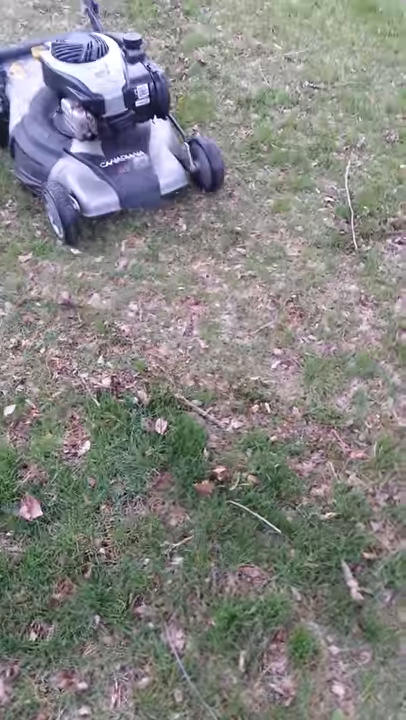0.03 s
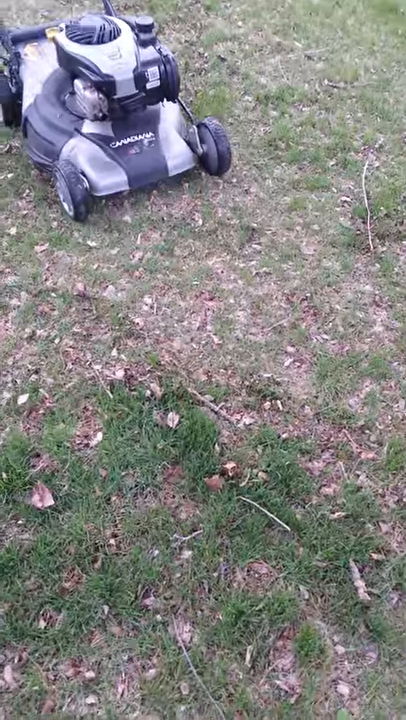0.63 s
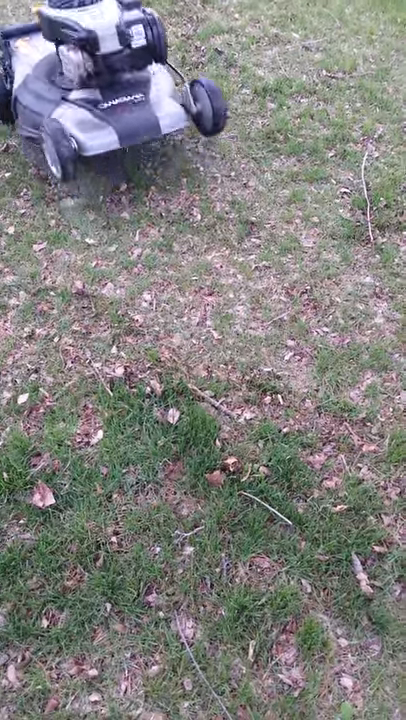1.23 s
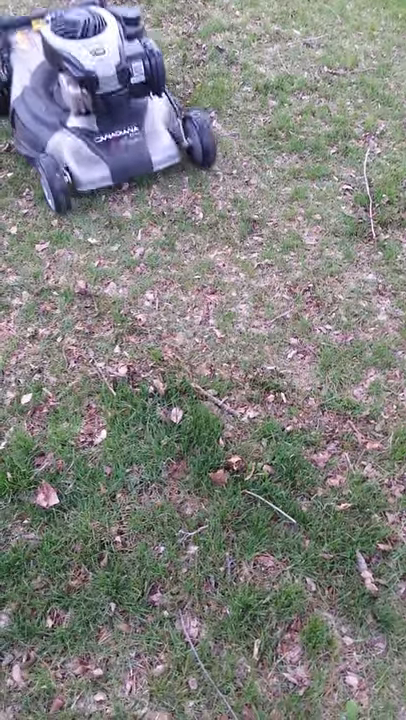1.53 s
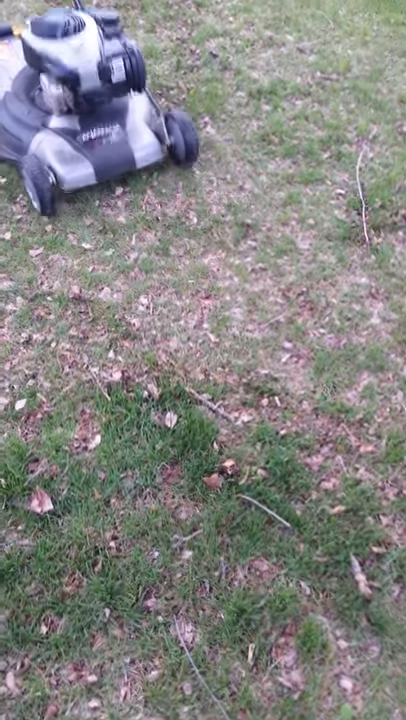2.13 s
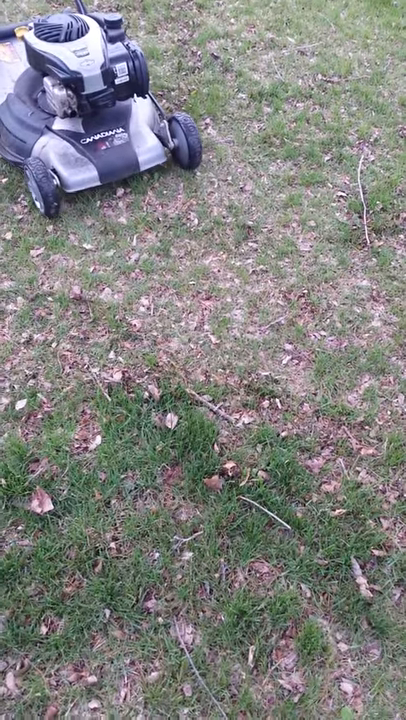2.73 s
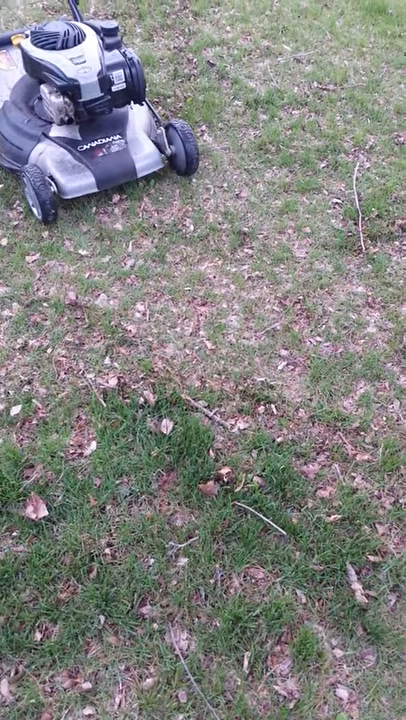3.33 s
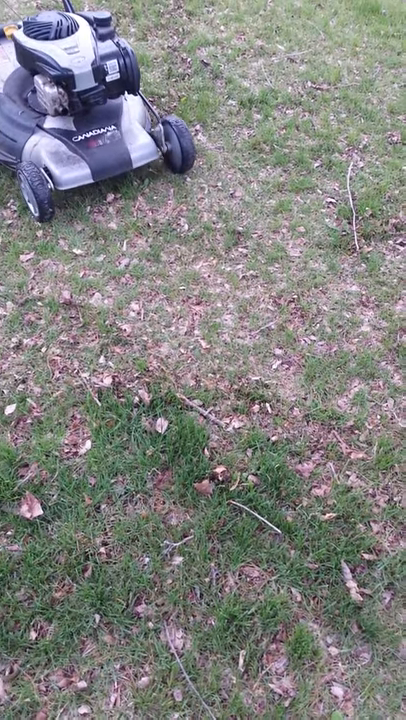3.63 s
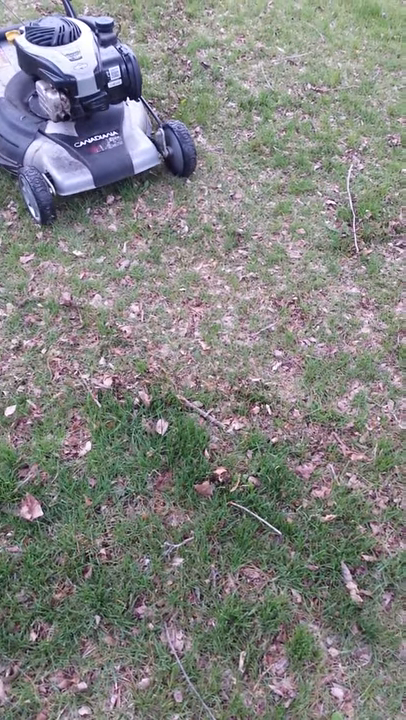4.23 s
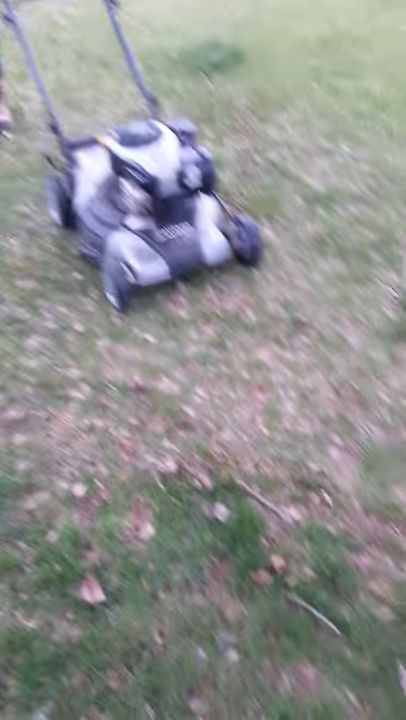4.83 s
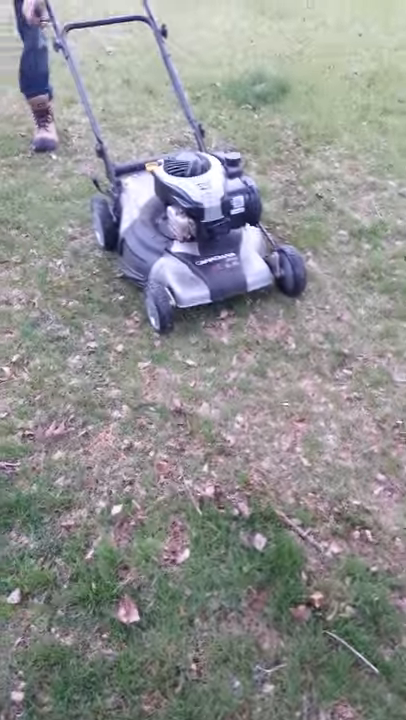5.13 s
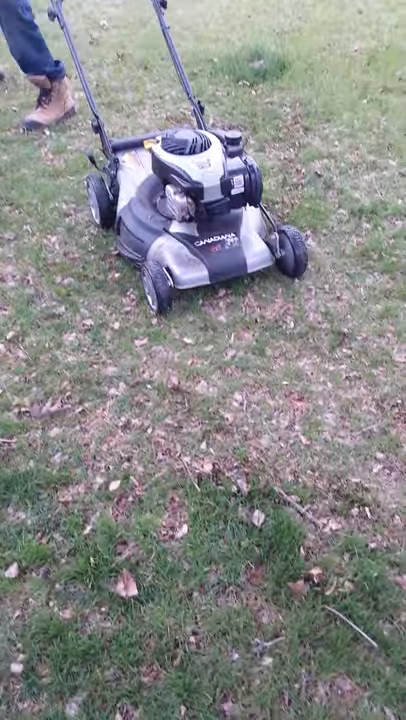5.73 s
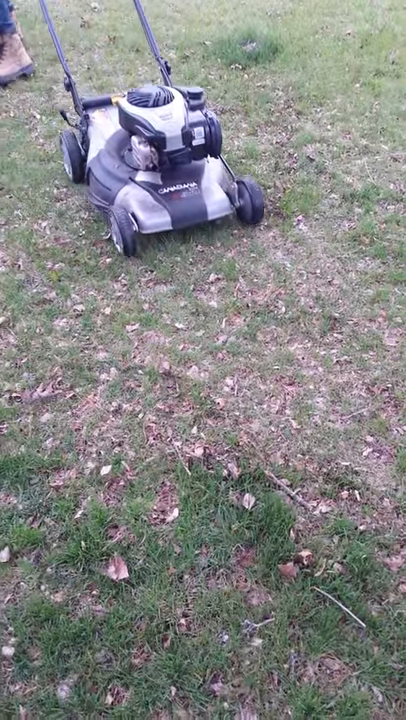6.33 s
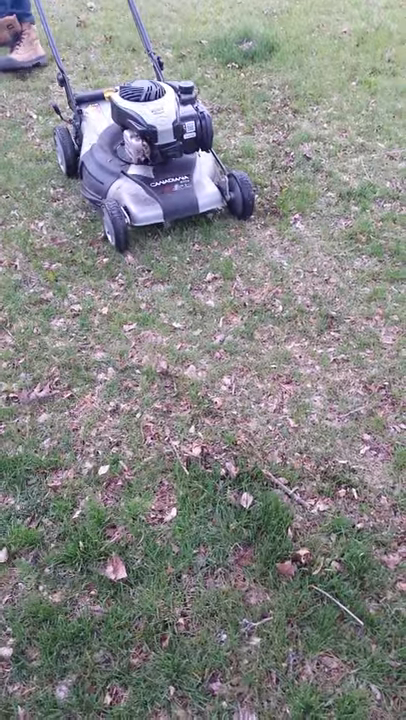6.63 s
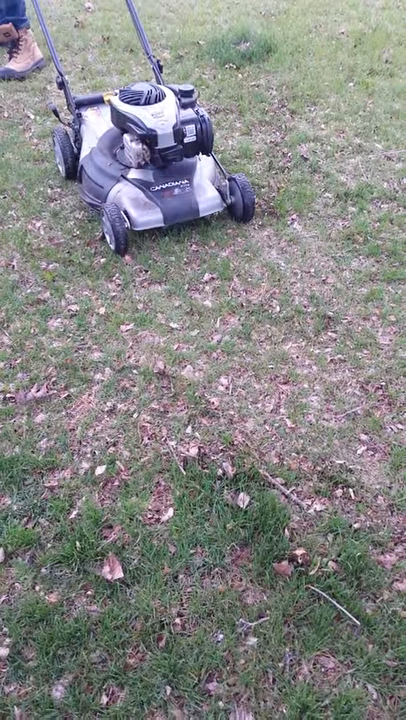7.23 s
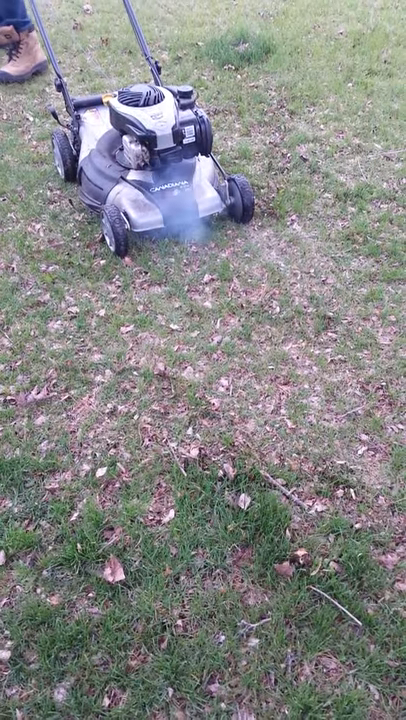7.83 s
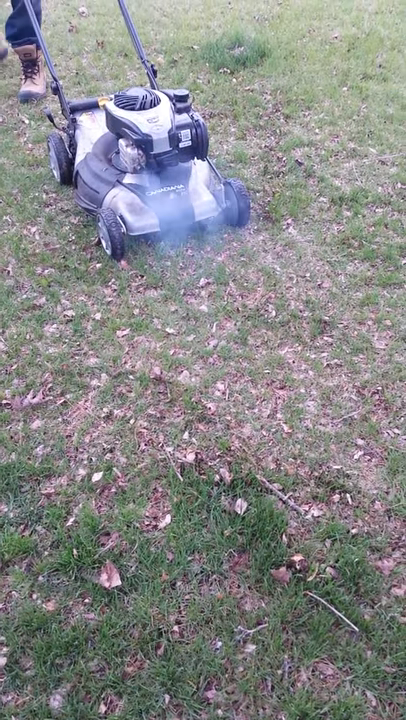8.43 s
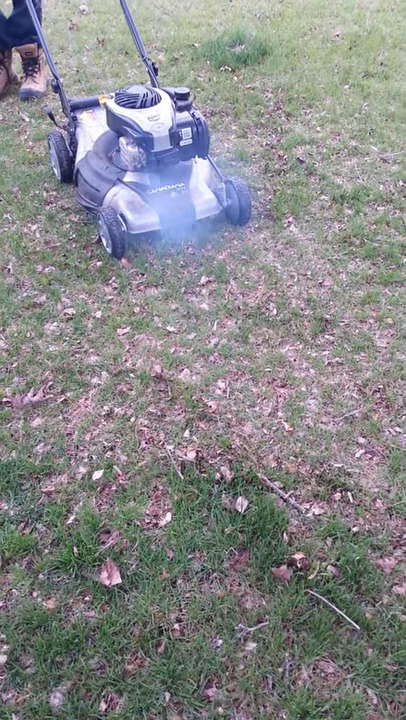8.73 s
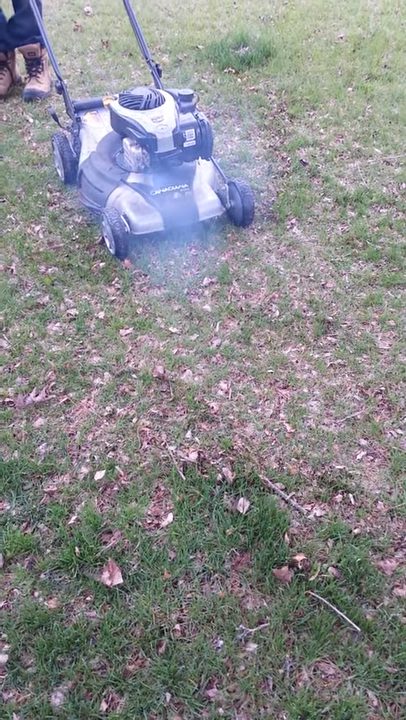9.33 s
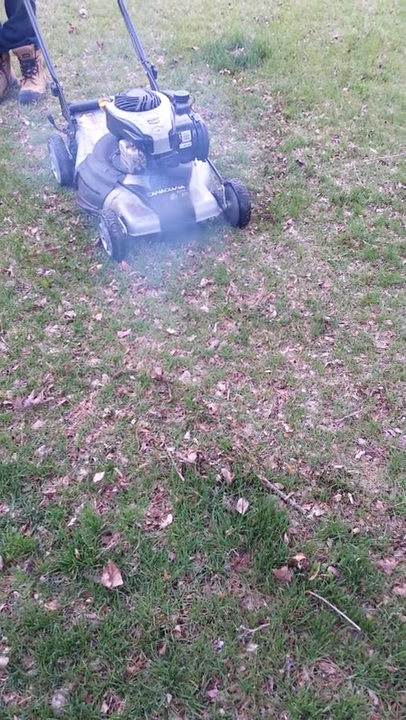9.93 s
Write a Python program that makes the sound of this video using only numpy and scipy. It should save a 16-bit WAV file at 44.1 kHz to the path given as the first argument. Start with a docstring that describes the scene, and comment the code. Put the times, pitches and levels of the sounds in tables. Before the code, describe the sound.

A small petrol lawn mower sputters and stalls, clatters and rolls over dry leaves, then is pull-started and chugs roughly.

```python
"""On a lawn, a petrol mower stands a little to one side of a stereo microphone. It chugs far below working
speed and stalls. Its front is lifted and dropped, the deck clatters, the wheels roll through dry leaves;
thin chirps sound far off. Then the starter cord whirrs and the engine chugs again, each slow cycle a pair
of gas thumps from the muffler, with hard metal knocks and small valve ticks ringing the housing."""
import sys
import numpy as np
from scipy import signal
from scipy.fft import rfft, irfft, next_fast_len
from scipy.io import wavfile
from scipy.ndimage import uniform_filter1d

SR = 44100
rng = np.random.default_rng(int(sys.argv[2]) if len(sys.argv) > 2 else 0)


def dump(signal):
    """Clip the signal to [-1, 1] and save it as 16-bit WAV at the path in sys.argv[1]."""
    limited = np.clip(np.atleast_2d(signal).T, -1, 1)
    pcm = np.round(limited * 32767).astype(np.int16)
    wavfile.write(sys.argv[1], SR, pcm)


N = 439677
TIME = np.arange(N) / SR
HZ = np.fft.rfftfreq(8192, 1 / SR)

# pulls of the starter cord: t/s, length/s, body level/dB, bright ring level/dB
CORD_PULLS = [(-.1, 0.25, -37.5, -26), (5.857, .31, -34, -25)]
# four-stroke cycles, whose spacing sets the crank speed: t/s, clank/dB, knock/dB, exhaust thump/dB
CHUGS = [(-.003, -28, -18.5, -20.5), (0.1331, -41, -23, -22.5), (0.2888, -48, -33, -25),
         (0.4761, -29.5, -17.5, -37.5), (0.6971, -44, -16, -32), (0.9531, -23.5, -16.5, -31.5),
         (1.261, -26.5, -27, -39), (5.987, -45, -47, -24), (6.107, -27, -46, -18), (6.227, -42, -51, -24),
         (6.357, -45, -50, -20.5), (6.5103, -28.5, -26.5, -27), (6.6797, -41, -19, -25.5),
         (6.8763, -19, -16.5, -22.5), (7.093, -50, -10, -16), (7.266, -21, -26, -24.5),
         (7.448, -16, -12, -16.5), (7.6187, -17, -8.5, -25), (7.804, -28, -9, -14.5),
         (7.974, -18.5, -29, -20.5), (8.1689, -15, -14, -13), (8.331, -25.5, -18.5, -27.5),
         (8.492, -16.5, -14.5, -14.5), (8.65, -17, -25, -22.5), (8.8231, -31, -9, -15),
         (8.988, -16, -20, -20), (9.173, -14.5, -14.5, -14), (9.3372, -16, -18, -17),
         (9.499, -31, -34, -20.5), (9.6806, -31, -7, -15.5), (9.836, -30, -42, -24.5)]
# stray knocks, out of step with the crank: t/s, level/dB
STRAY_KNOCKS = [(.061, -20), (0.171, -16), (1.1208, -18), (6.1442, -10.5), (6.326, -23.5)]
# hard clacks and a lingering hiss in the low treble: t/s, decay/s, level/dB
CLACKS = [(.061, 0.0055, -6.5), (.315, 0.023, -24), (1.032, 0.013, -27), (1.121, 0.012, -14),
          (1.503, 0.016, -10), (1.719, 0.0074, -16.5), (1.858, 0.018, -34.5), (2.41, 0.28, -46.5),
          (4.785, 0.007, -43), (8.457, 0.0052, 5.5)]
# shoves of the wheels and steps through grass and leaves: t/s, length/s, tread/dB, leaf hiss/dB
SHOVES = [(0.838, .45, -55, -44.5), (1.412, 0.26, -43.5, -42.5), (2.096, 0.26, -51, -51.5),
          (2.4, .38, -62.5, -54), (3.065, 0.098, -66.5, -55.5), (3.541, 0.14, -62, -53.5),
          (4.197, 0.24, -58.5, -57.5), (4.523, .07, -55, -47.5), (4.805, 0.084, -54.5, -47),
          (4.934, 0.46, -65.5, -56.5), (5.594, 0.43, -58.5, -52.5)]
# blows on deck, wheels and handle: t/s, decay/s, level/dB, brightness/dB
BUMPS = [(1.262, 0.022, -21.5, -5), (1.306, 0.027, -26, -2), (1.5046, .018, -22, 5), (1.561, 0.038, -18, 1),
         (1.596, 0.0077, -19, -25), (1.7178, 0.016, -25, -20), (1.8556, 0.023, -37.5, -12),
         (1.9534, 0.018, -15, 5), (1.97, 0.048, -22.5, 0.5), (2.005, 0.026, -20, -7),
         (2.046, 0.019, -31, 6), (2.1645, 0.012, -25.5, 4.5), (2.207, 0.053, -35.5, 8),
         (2.262, 0.0072, -26, 10.5), (2.356, 0.011, -25.5, 7), (2.402, 0.035, -46, -5),
         (2.756, 0.031, -49.5, -6), (3.286, 0.018, -53.5, 4), (3.6087, 0.021, -37, 3.5),
         (3.6558, 0.027, -30.5, -14), (3.7434, 0.046, -43.5, -26), (3.7952, 0.011, -43, 18.5),
         (3.845, 0.0081, -50, -3), (4.213, 0.016, -51, -15), (4.55, 0.022, -46, -10), (4.783, .003, -45, 9),
         (4.837, 0.01, -43, -12), (5.378, 0.041, -62, -6), (5.6035, 0.013, -38.5, 6),
         (5.7608, 0.01, -45, 10.5), (5.829, .022, -40.5, 9.5)]
# faint chirps, probably a far bird: t/s, length/s, first f/Hz, last f/Hz, level/dB
CHIRPS = [(4.025, .03, 3460, 4100, -68), (4.08, .08, 3380, 3330, -70), (4.6, .04, 3450, 2900, -68),
          (4.843, .08, 3550, 3250, -60), (5.32, .05, 3450, 3350, -68), (5.385, .03, 3100, 2750, -67)]
# hum of the starter pulley: t/s, f/Hz, level/dB
PULLEY = [(5.865, 293, -46), (5.9, 307, -28.5), (5.918, 290, -28), (5.945, 338, -46)]
# broad colours of engine housing, steel deck, leaves and outdoor air: f/Hz, level/dB
HOUSING_COLOUR = [(120, -28), (200, 0), (320, -9), (512, -4), (1260, -11.5), (1430, -13.5), (2060, -7),
                  (2210, -12.5), (3350, -14), (6530, -13), (10100, -26), (15000, -33.5)]
DECK_COLOUR = [(29, -47.5), (50, -33.5), (204, -6.5), (354, -12.5), (1220, -20.5), (1410, -23.5),
               (2020, -15), (2450, -19), (4130, -18), (6510, -23), (10500, -39), (15000, -45.5)]
LEAF_COLOUR = [(88, -40), (150, 9), (294, 3), (386, 0.5), (1160, -7), (1490, -6), (5610, -12.5),
               (7080, -7.5), (10400, -19.5), (15000, -24.5)]
AIR_COLOUR = [(15, -41), (25, 8.5), (213, -9), (2130, -21.5), (3930, -14), (4620, -17), (15000, -24.5)]
# resonances of the housing, a small chinking part and the deck: f/Hz, width/Hz, height/dB
HOUSING_MODES = [(280.6, 12, 6.9), (552, 70, 3.73), (775, 55, 4.5), (1258, 160, 7.8), (1559, 74, 6.5),
                 (2031, 45, 6.4), (2860, 45, 8.6), (4780, 68, 1.7), (6430, 160, 4.1)]
CHINK_MODES = [(5300, 200, 17), (7400, 350, 12)]
DECK_MODES = [(193.6, 86, 5), (266, 6.8, 10), (420, 42, 4), (572, 79, 3.4), (775, 39, 5.5), (1165, 51, 4.6),
              (6900, 330, 4.7)]
# how alike the two microphone ports hear the mower and lawn: f/Hz, likeness (0-1)
PORT_LIKENESS = [(150, .998), (600, .97), (1300, .84), (5000, .66), (10000, .35)]
# balance between the ports: f/Hz, left minus right/dB
PORT_BALANCE = [(150, 1.96), (700, -1.5), (2300, 4), (5000, 2), (8000, -0.2), (13000, -2.5)]

# where each sound falls, in cycles after the knock
AT_CHINK, AT_CLANK, AT_INTAKE, AT_RUSH, AT_EXHAUST, AT_TICK = -.24, -.162, -.16, .087, .1824, .38
IDLE_PER_S, RATTLE_DB_PER_OCTAVE = 5.7, 7.5  # cycles a second at idle; rattle and ticks grow with speed
STALL_S, CATCH_S = 1.3, 5.92  # the crank stops; it turns again


def amp(db):
    """Decibels to gain."""
    return 10 ** (np.asarray(db) / 20)


def unit(x):
    """Scales to rms 1."""
    return x / np.sqrt(np.mean(x ** 2) + 1e-20)


def noise():
    """White noise in two rows: what the microphone ports share, and what sets them apart."""
    return rng.standard_normal((2, N))


def wander(length, span):
    """Random drift of rms 1, smoothed over span points."""
    return unit(uniform_filter1d(rng.standard_normal(length), span))


def read(points, hz):
    """Reads a table on a log-frequency axis."""
    f, value = np.transpose(points)
    return np.interp(np.log(hz + 1), np.log(f + 1), value)


def add(mix, s, sound):
    """Mixes a sound in at time s."""
    at = round(s * SR)
    part, sound = mix[max(at, 0):], sound[max(-at, 0):]
    part[:len(sound)] += sound[:len(part)]


def body(colour, modes=()):
    """Gain against frequency of a broad colour with resonances on top."""
    peaks_db = sum(db / (1 + (2 * (HZ - hz) / width) ** 2) for hz, width, db in modes)
    return amp(read(colour, HZ) + peaks_db)


def ring(x, gain, lo_hz, hi_hz):
    """Passes x through one band of a body: a causal response of energy 1."""
    band = gain / np.sqrt((1 + (lo_hz / (HZ + 1)) ** 10) * (1 + (HZ / hi_hz) ** 10))
    log_gain = np.log(np.maximum(band / band.max(), 1e-5))
    mirrored = np.concatenate([log_gain, log_gain[-2:0:-1]])
    response = np.fft.ifft(np.exp(np.conj(signal.hilbert(mirrored)))).real[:len(HZ)]  # minimum phase
    return signal.oaconvolve(x, response[None] / np.linalg.norm(response), axes=1)[:, :N]


def chatter(per_s, spread_db, patchy_db=5.5, flicker_db=2.03):
    """Many tiny contacts over a smooth rush; each flurry lands on another spot and wakes other partials."""
    contacts = (rng.random(N) < per_s / SR) * amp(spread_db * np.minimum(rng.exponential(1, N), 4))
    spectra = signal.stft((unit(contacts) + 1) * noise(), nperseg=512)[2]
    patches = uniform_filter1d(rng.standard_normal(spectra.shape[1:]), size=7, axis=1)
    patches = unit(uniform_filter1d(patches, size=2, axis=0))
    colour = amp(patchy_db * unit(np.tanh(patches)))
    flicker = amp(flicker_db * wander(spectra.shape[-1], span=2))
    return unit(signal.istft(spectra * colour * flicker)[1][:, :N])


def blows(rows, rise_s, crack=0):
    """Force of blows (t/s, decay/s, level/dB): a quick rise, an optional hard crack, then a decay."""
    power, t = np.zeros(N), TIME[:SR // 2]
    attack = (1 - np.exp(-t / rise_s)) * (1 + crack * np.exp(-(t / 0.014) ** 4))
    for s, decay, db in rows:
        add(power, s, (amp(db) * attack * np.exp(-t / decay)) ** 2)
    return np.sqrt(power)


def swells(rows, attack_s, release_s):
    """Gain curve of movements (t/s, length/s, level/dB): each rises, holds and dies away."""
    power = np.zeros(N)
    for s, length, db in rows:
        rise = np.clip((TIME - s) / attack_s, 0, 1)
        fall = np.exp(-np.maximum(TIME - s - length, 0) / release_s)
        power += (amp(db) * rise * fall) ** 2
    return np.sqrt(power)


def crank(phase):
    """When each cycle passes this phase (t/s), and how fast it turns there (octaves above idle)."""
    s = np.array(CHUGS)[:, 0]
    gaps = np.pad(np.diff(s), 1, mode="edge")
    near, far = (gaps[1:], gaps[:-1]) if phase > 0 else (gaps[:-1], gaps[1:])
    period = np.where(near < 1, near, far)  # the standstill is no cycle
    return s + phase * period, -np.log2(period * IDLE_PER_S)


def strokes(phase, decay_s, db):
    """One blow (t/s, decay/s, level/dB) at this phase of every cycle."""
    return np.column_stack(np.broadcast_arrays(crank(phase)[0], decay_s, db))


def running():
    """1 while the crank turns, 0 at a standstill."""
    return swells([(-1, 1 + STALL_S, 0), (CATCH_S, TIME[-1], 0)], attack_s=0.026, release_s=.02)


def air(level_db=-62.5):
    """Quiet outdoor air all round the microphone, mostly low rumble."""
    return amp(level_db) * ring(noise(), body(AIR_COLOUR), lo_hz=45.7, hi_hz=17000)


def turning(idle_db=-38.5):
    """Force of the steady rattle, body and bright ring: it follows crank speed and each cord pull."""
    speed = np.interp(TIME, *crank(AT_INTAKE))
    spin = running() * amp(idle_db + RATTLE_DB_PER_OCTAVE * speed)
    pulls = [swells(np.array(CORD_PULLS)[:, [0, 1, k]], attack_s=0.11, release_s=.06) for k in (2, 3)]
    return [np.hypot(spin, pull) for pull in pulls]


def knocking(knock_decay_s=.017, decay_s=.019):
    """Blows on the housing, body and bright ring: each cycle a dull clank, a knock and an exhaust rush."""
    s, clank, knock, exhaust = np.transpose(CHUGS)
    hard = [*zip(s, knock), *STRAY_KNOCKS]
    low = [(at, knock_decay_s, 0.43 * db - 12.5) for at, db in hard]  # grows less: harder is brighter
    high = [(at, knock_decay_s, db) for at, db in hard]
    low += [*strokes(AT_CLANK, decay_s, clank), *strokes(AT_RUSH, decay_s, exhaust - 6)]
    high += [*strokes(AT_CLANK, decay_s, clank - 5.5), *strokes(AT_RUSH, decay_s, exhaust - 3.5)]
    return low, high


def engine():
    """Knocks and steady rattle ring the same metal housing."""
    housing = body(HOUSING_COLOUR, HOUSING_MODES)
    (low_rattle, high_rattle), (low_blows, high_blows) = turning(), knocking()
    low = np.hypot(blows(low_blows, rise_s=0.0025, crack=0.18), low_rattle)
    high = np.hypot(blows(high_blows, rise_s=0.0056, crack=0.6), high_rattle)
    clank = ring(low * chatter(per_s=2500, spread_db=2, patchy_db=2.5), housing, lo_hz=195, hi_hz=2316)
    clink = ring(high * chatter(per_s=3000, spread_db=2.5), housing, lo_hz=2690, hi_hz=14200)
    return clank + clink


def muffler(width_s=0.0044, lead_s=0.00092, intake_hz=140, exhaust_hz=115):
    """Each stroke shoves gas through the muffler: a short pressure swing, deeper on the exhaust."""
    pulses, t = np.zeros(N), np.arange(-SR // 50, SR // 50) / SR
    intakes, speed = crank(AT_INTAKE)
    intake_db = -24 + 8 * speed  # the faster the crank, the harder it draws air
    exhausts, exhaust_db = crank(AT_EXHAUST)[0], np.array(CHUGS)[:, 3]
    for times, levels, hz in [(intakes, intake_db, intake_hz), (exhausts, exhaust_db, exhaust_hz)]:
        swing = np.sin(2 * np.pi * hz * (t + lead_s)) * np.exp(-(t / width_s) ** 2 / 2)
        for s, db in zip(times, levels):
            add(pulses, s + t[0], amp(db) * swing)
    pulses *= running()
    pulse_rms = np.sqrt(abs(uniform_filter1d(pulses ** 2, SR // 25)))
    flow = turning()[0] + amp(-4) * pulse_rms
    turbulence = ring(flow * noise(), 1, lo_hz=67, hi_hz=220)
    return np.array([pulses, np.zeros(N)]) + amp(-9) * turbulence


def valves(idle_db=-20.5):
    """Short ticks in the middle resonances of the housing, twice a cycle and louder with speed."""
    ticks = []
    for phase in (AT_TICK, AT_TICK - .5):
        speed = crank(phase)[1]
        ticks.extend(strokes(phase, decay_s=0.0049, db=idle_db + RATTLE_DB_PER_OCTAVE * speed))
    force = running() * blows(ticks, rise_s=0.0038)
    return ring(force * noise(), body(HOUSING_COLOUR, HOUSING_MODES), lo_hz=1354, hi_hz=2300)


def loose_parts():
    """Hard parts clack and scrape; a small one chinks on two high partials ahead of each intake."""
    rattle = chatter(per_s=1000, spread_db=8)
    clacks = blows(CLACKS, rise_s=0.00061) * rattle
    chinks = blows(strokes(AT_CHINK, decay_s=0.0048, db=-9), rise_s=0.015) * rattle
    return (ring(clacks, body(HOUSING_COLOUR, HOUSING_MODES), lo_hz=2770, hi_hz=3950)
            + ring(chinks, body(HOUSING_COLOUR, CHINK_MODES), lo_hz=4200, hi_hz=9100))


def lawn():
    """Wheels and feet press the grass with a dull tread and brush dry leaves into a hiss."""
    leaves, shoves = body(LEAF_COLOUR), np.array(SHOVES)
    weight, brush = (swells(shoves[:, [0, 1, k]], attack_s=0.038, release_s=0.14) for k in (2, 3))
    tread = weight * chatter(per_s=460, spread_db=1.5, patchy_db=8, flicker_db=2.5)
    hiss = brush * chatter(per_s=2300, spread_db=0.5, patchy_db=1.5)
    return ring(tread, leaves, lo_hz=168, hi_hz=2550) + ring(hiss, leaves, lo_hz=2680, hi_hz=17000)


def deck(touch_s=0.016, touch_db=-18):
    """The steel pan booms when it lands; loose wheels and handle clatter with it."""
    pan = body(DECK_COLOUR, DECK_MODES)
    s, decay, db, bright = np.transpose(BUMPS)

    def landing(levels, rise_s):
        """The wheels touch the grass just before the weight lands."""
        return blows([*zip(s, decay, levels), *zip(s - touch_s, decay, levels + touch_db)], rise_s)

    boom_db = db - 5 + 6 * np.log2(decay / 0.016)  # long, heavy blows boom more than short taps
    clatter_db = 1 + 1.186 * db + 0.61 * bright  # strong blows shake loose parts much more
    rattle = chatter(per_s=1800, spread_db=0.5, patchy_db=4.5)
    boom = ring(landing(boom_db, rise_s=0.0024) * noise(), pan, lo_hz=50, hi_hz=324)
    clank = ring(landing(db, rise_s=0.0018) * rattle, pan, lo_hz=352, hi_hz=1400)
    clatter = ring(landing(clatter_db, rise_s=0.0012) * rattle, pan, lo_hz=1430, hi_hz=4340)
    clink = ring(landing(db + bright - 2, rise_s=0.001) * rattle, pan, lo_hz=4650, hi_hz=14900)
    return boom + clank + clatter + clink


def chirps(waver=.04):
    """Far off and straight ahead of the microphone, thin unsteady tones glide as they swell and fade."""
    drift, tones = 1 + waver * wander(N, span=70), np.zeros(N)
    for s, length, first_hz, last_hz, db in CHIRPS:
        hz = np.interp(TIME, [s, s + length], [first_hz, last_hz]) * drift
        envelope = swells([(s, length, db)], attack_s=0.023, release_s=.02)
        tones += envelope * np.sin(2 * np.pi * np.cumsum(hz) / SR)
    return np.array([tones, tones])


def starter(roughness=0.06, db_per_octave=-9, fade_s=.01):
    """The cord spins the pulley, which hums briefly with a few overtones."""
    s, hz, db = np.transpose(PULLEY)
    cycles = np.cumsum(np.interp(TIME, s, hz)) / SR
    hum = sum(amp(db_per_octave * np.log2(k)) * np.sin(2 * np.pi * k * cycles) for k in range(1, 7))
    judder = 1 + roughness * wander(N, span=200)
    outside_s = abs(TIME - np.clip(TIME, s[0], s[-1]))
    envelope = amp(np.interp(TIME, s, db)) * np.exp(-outside_s / fade_s)
    return np.array([unit(hum) * judder * envelope, np.zeros(N)])


def scene(lag_s=0.00015):
    """The mower stands off axis: the left port hears it later, and the treble differs between ports."""
    sources = engine() + muffler() + valves() + loose_parts() + deck() + starter() + lawn() + air()
    size = next_fast_len(N + SR // 10)
    shared, apart = rfft(sources, size)
    hz = np.fft.rfftfreq(size, 1 / SR)
    likeness, tilt = read(PORT_LIKENESS, hz), amp(read(PORT_BALANCE, hz) / 2)
    shared *= np.sqrt((1 + likeness) / 2)
    apart *= np.sqrt((1 - likeness) / 2)
    left = (shared + apart) * tilt * np.exp(-2j * np.pi * hz * lag_s)
    right = (shared - apart) / tilt
    return irfft(np.array([left, right]), size)[:, :N] + chirps()


def record(dry, cutoff_hz=15700):
    """The loudest peaks are softly rounded off; then the top of the treble is cut."""
    lowpass = signal.firwin(511, cutoff_hz, window=("kaiser", 9), fs=SR)
    rounded = dry / (1 + dry ** 4) ** (1 / 4)
    return signal.oaconvolve(rounded, lowpass[None], "same")


dry = scene()
out = record(dry)
dump(out)
```